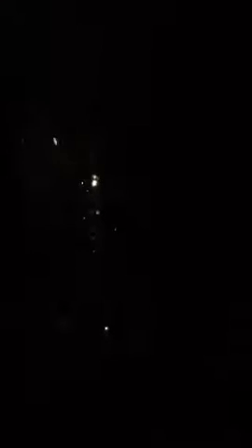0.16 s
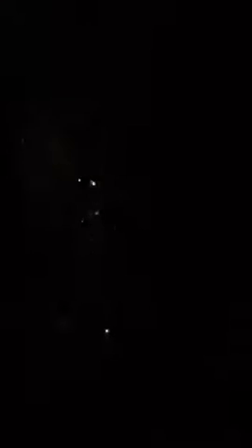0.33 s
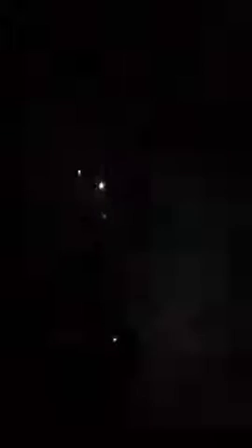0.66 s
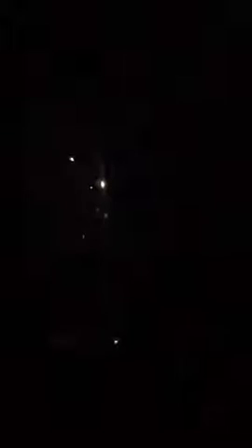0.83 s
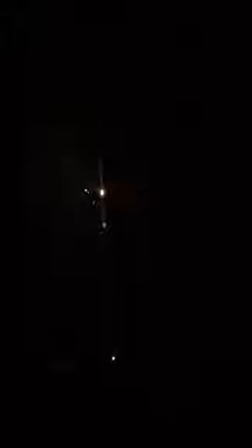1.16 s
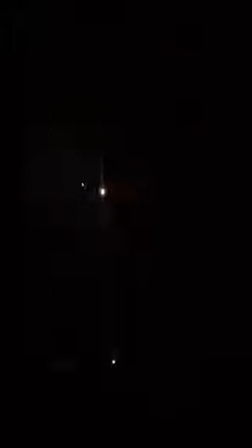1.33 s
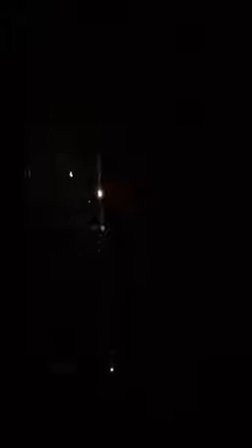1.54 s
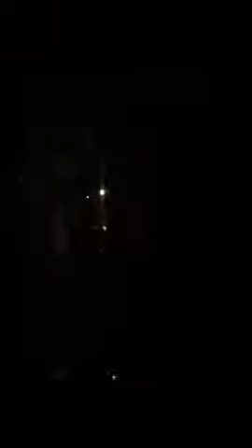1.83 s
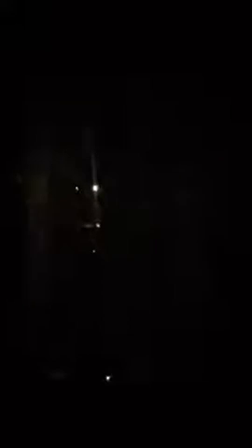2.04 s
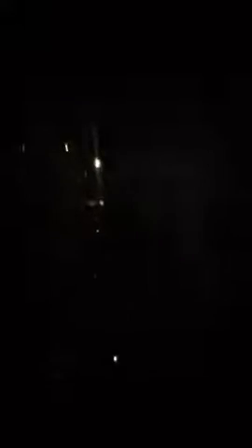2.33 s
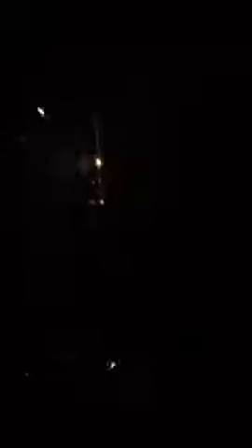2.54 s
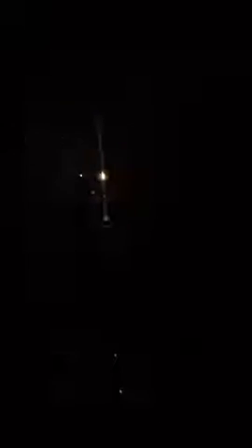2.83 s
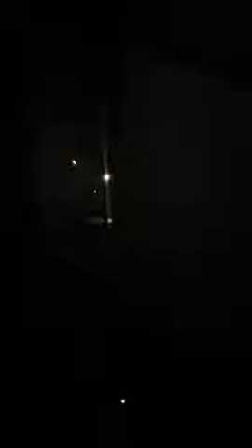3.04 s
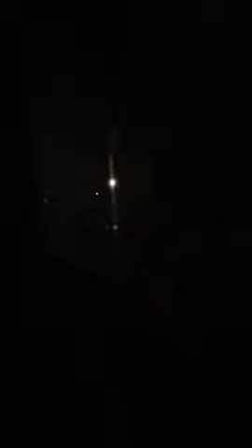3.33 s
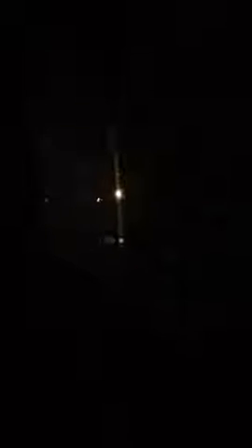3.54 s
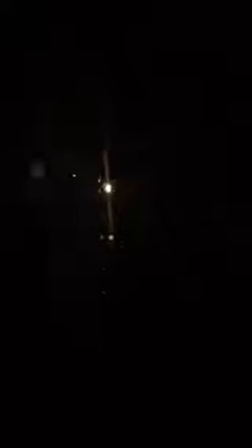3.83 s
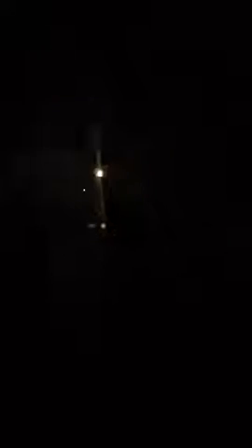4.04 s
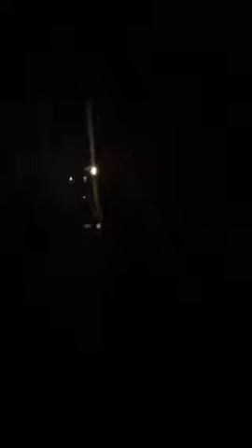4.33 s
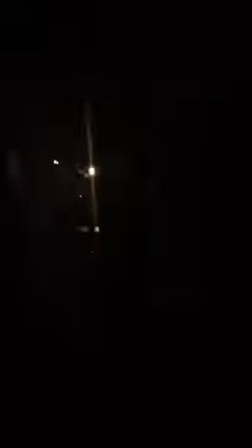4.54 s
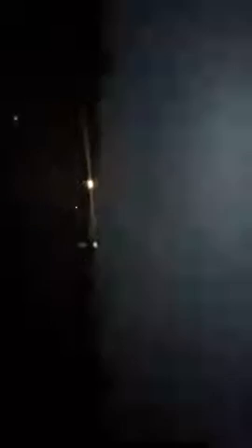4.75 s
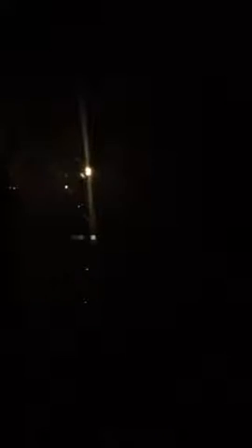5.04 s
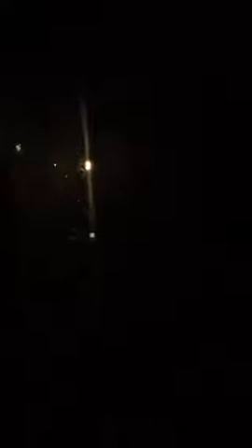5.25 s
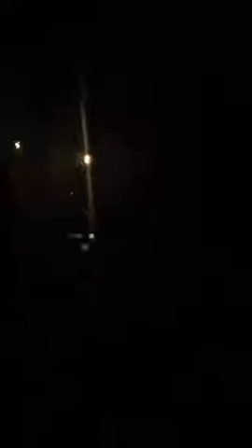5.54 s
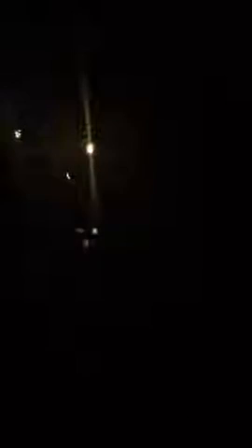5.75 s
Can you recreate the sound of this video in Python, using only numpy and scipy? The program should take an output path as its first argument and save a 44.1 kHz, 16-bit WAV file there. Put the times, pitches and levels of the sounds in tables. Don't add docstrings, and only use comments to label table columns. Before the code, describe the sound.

Heavy rain roars steadily on a car roof while a deep, lurching road and wind rumble swells underneath and drops tick on the windscreen.

```python
import sys
import numpy as np
from scipy import signal
from scipy.fft import rfft, irfft, next_fast_len
from scipy.io import wavfile
from scipy.ndimage import uniform_filter1d

SR = 44100
rng = np.random.default_rng(int(sys.argv[2]) if len(sys.argv) > 2 else 0)


def to_linear_factor(level_db):
    exponent = np.asarray(level_db, float) / 20
    return 10 ** exponent


def output_pcm(signal):
    pcm = np.clip(np.atleast_2d(signal).T, -1, 1) * 32767
    wavfile.write(sys.argv[1], SR, np.round(pcm).astype(np.int16))


N = 259749


def rms_one(x):
    return x / np.sqrt(np.mean(x ** 2) + 1e-20)


def drift(rate_hz):
    r = np.exp(-80 * np.pi * rate_hz / SR)
    chance = rng.standard_normal(N // 40 + 2002)
    slow = signal.lfilter([1], [1, -2 * r, r * r], chance)[2000:]
    return np.interp(np.arange(N) / 40, np.arange(len(slow)), rms_one(slow))


def colour(x, spectrum):
    size = next_fast_len(N)
    hz = np.maximum(np.arange(size // 2 + 1) * SR / size, 1)
    point_hz, point_db = np.array(spectrum, float).T
    gain_db = np.interp(np.log(hz), np.log(point_hz), point_db, left=-90, right=-90)
    return rms_one(irfft(rfft(x, size) * to_linear_factor(gain_db), size)[:N])


def resonate(x, modes):
    out = 0
    for k, (hz, width_hz, gain_db) in enumerate(modes):
        r = np.exp(-np.pi * width_hz / SR)
        b = [(1 - r * r) / 2, 0, (r * r - 1) / 2]
        a = [1, -2 * r * np.cos(2 * np.pi * hz / SR), r * r]
        out = out + (-1) ** k * to_linear_factor(gain_db) * signal.lfilter(b, a, x + 1e-18)
    return out


def swells(s, heights, half_s):
    t = np.arange(0, N + 40, 40) / SR
    bells = np.exp(-((t[:, None] - s) / half_s) ** 2) @ heights
    return np.interp(np.arange(N) / SR, t, bells)


def shaken_level(rest_db, swell_power):
    return 10 * np.log10(to_linear_factor(2 * rest_db) + swell_power)


def body_mode(spectrum, level_db, span_s, firmness):
    x = colour(rng.standard_normal(N), spectrum)
    width = int(span_s * SR)
    chance_power = uniform_filter1d(uniform_filter1d(x ** 2, width), width) + 0.04
    return to_linear_factor(level_db) * rms_one(x / chance_power ** (firmness / 2))


def rumble():
    # frequency in Hz, density in dB per Hz
    throb_spectrum = [(15, -35.5), (25, -8), (32, -10), (43, 3), (55, 2.5), (66, -2.5), (80, -32)]
    boom_spectrum = [(50, -32.5), (62, -9), (72, -3.5), (92, 0), (110, -4.5), (122, -8.5), (145, -39)]
    drone_spectrum = [(95, -41), (112, -1), (135, -1.5), (160, -3.5), (190, -5.5), (215, -13.5), (260, -21),
                      (340, -33.5)]
    # time in seconds, peak in dB
    buffets = [(.138, -33), (.741, -40), (.957, -29.5), (1.249, -37), (1.524, -30), (1.669, -29),
               (1.85, -31), (2.041, -32), (2.156, -28), (2.4, -29), (2.5, -31), (2.62, -32), (3.05, -30),
               (3.365, -27.5), (3.735, -34), (3.959, -33), (4.086, -28), (4.288, -27), (4.51, -28),
               (5.1, -27.5), (5.379, -32), (5.531, -29.5), (5.698, -30), (5.828, -26)]
    # time in seconds, peak in dB, sharpness from 0 to 1
    bumps = [(.036, -25, 0.087), (.238, -26.5, 1), (.39, -23.5, .1), (.59, -29, 0.41), (.81, -21.5, 0.015),
             (1.005, -28, 0.019), (1.191, -23, 0.11), (1.331, -30, 0.0067), (1.438, -29, .9),
             (1.64, -21.5, .6), (2.135, -26.5, .4), (2.33, -23, 0.33), (2.472, -21.5, 0.031),
             (2.884, -27, 0.53), (3.12, -24.5, 0.51), (3.202, -25, 0.68), (3.492, -27, 0.02),
             (3.574, -27, 1), (3.673, -25, 0.42), (3.755, -24, 0.83), (3.9, -20.5, .1),
             (4.218, -24.5, 0.025), (4.31, -28, 0.28), (4.453, -23, 0.8), (4.57, -25, 0.026),
             (4.775, -25.5, 0.91), (4.882, -28, 1), (5.13, -26, 0), (5.299, -24.5, 0.0041),
             (5.637, -27.5, 0.31)]
    # time in seconds, half length in seconds, depth in dB
    lulls = [
        (0.696, 0.052, -4.5),
        (0.891, 0.027, -10.5),
        (1.927, 0.076, -1.5),
        (2.675, 0.079, -3.5),
        (2.946, 0.018, -6),
        (3.36, 0.023, -2.5),
        (5.01, 0.023, -2),
    ]
    buffet_half_s, bump_half_s = 0.028, 0.026

    s, half_s, depth_db = np.transpose(lulls)
    lull_db = swells(s, depth_db, half_s)
    s, peak_db = np.transpose(buffets)
    throb_db = shaken_level(-36 + lull_db, swells(s, to_linear_factor(2 * peak_db), buffet_half_s))
    s, peak_db, sharp = np.transpose(bumps)
    power = to_linear_factor(2 * peak_db)
    boom_db = shaken_level(-31 + lull_db, swells(s, power * (1 - sharp), bump_half_s))
    drone_db = shaken_level(-29.5 + lull_db, swells(s, power * sharp, bump_half_s))

    throb = body_mode(throb_spectrum, throb_db, span_s=0.042, firmness=0.87)
    boom = body_mode(boom_spectrum, boom_db, span_s=0.067, firmness=0.63)
    drone = body_mode(drone_spectrum, drone_db, span_s=0.053, firmness=0.41)
    return throb + boom + drone


def downpour():
    # time in seconds, level in dB
    strength = [(0, -34.5), (.3, -34), (.65, -33.5), (1.3, -33.5), (2.0, -33.5), (2.27, -32.5),
                (2.58, -34.5), (3.0, -32.5), (3.35, -33), (3.95, -34.5), (4.2, -33.5), (4.65, -33.5),
                (5.13, -34), (5.58, -33.5), (5.89, -34)]
    s, level_db = np.transpose(strength)
    return np.interp(np.arange(N) / SR, s, level_db)


def impacts(per_s, spread_db):
    sizes = to_linear_factor(spread_db * np.minimum(rng.exponential(1, N), 4)) * rng.choice([-1, 1], N)
    return sizes * (rng.random(N) < per_s / SR)


def roof(level_db):
    # frequency in Hz, density in dB per Hz
    roof_spectrum = [(130, -35.5), (220, -0.5), (366, -2), (509, -7), (682, -10), (746, -14), (837, -12.5),
                     (1040, -14.5), (1310, -16), (1430, -16), (2400, -22.5), (2980, -24), (4600, -31.5),
                     (5980, -64.5), (10100, -120)]
    # frequency in Hz, width in Hz, gain in dB
    panels = [(1410, 70, -8), (1782, 200, -13), (680, 40, -10.5), (841, 62, -13), (374.5, 40, -8),
              (3054, 300, -24.5), (2526, 110, -25)]
    hits = rms_one(impacts(per_s=9000, spread_db=1.5)) * to_linear_factor(0.46 * drift(14))
    ringing = to_linear_factor(15) * resonate(rms_one(hits[::-1]), panels)
    return to_linear_factor(level_db) * rms_one(colour(hits, roof_spectrum) + ringing)


def cabin(hits, modes):
    t60_s, tail_db = 0.043, -17
    r = to_linear_factor(-2 * 60 / (t60_s * SR))
    delay = np.r_[np.zeros(24), 1]
    energy = signal.lfilter(delay, [1, -r], hits ** 2 + 1e-18)
    tail = to_linear_factor(tail_db) * np.sqrt(energy) * rng.standard_normal(N)
    return resonate(hits + tail, modes)


def windscreen(level_db):
    # time in seconds, peak in dB, low part in dB relative to the peak
    drops = [(0.178, -32, -1), (0.2184, -30.5, -6), (0.608, -28.5, 5), (0.8031, -32, -1), (0.843, -28, -6),
             (1.1133, -24, -11), (1.3219, -26, -20.5), (1.4335, -30, -2), (1.538, -30, -8),
             (1.5983, -27.5, -5), (1.6741, -30, 0), (2.0927, -30, -8), (2.2995, -29.5, -12),
             (2.4274, -27, -9), (2.4768, -29, -6), (2.6854, -33, -8), (2.8563, -27, -6.5), (3.331, -28, -6),
             (3.588, -28.5, -3), (4.0052, -27, -12), (4.2067, -30, -16), (4.311, -30, -13),
             (4.4205, -34, -9), (4.555, -33, -4), (4.7247, -28.5, -3), (5.1866, -33, -1), (5.506, -31, -6),
             (5.6361, -29, -6), (5.671, -38, -2.5), (5.8631, -33, -6)]
    # frequency in Hz, width in Hz, gain in dB
    glass = [(4420, 1500, -1.5), (5780, 1080, 3.5), (7080, 2100, -1.5)]
    low_glass = [(3530, 370, 0)]

    clumps = to_linear_factor(3.2 * drift(8.1))
    small = cabin(impacts(per_s=900 * clumps, spread_db=2.5), glass)
    spray = resonate(rng.standard_normal(N), glass)
    patter = to_linear_factor(level_db) * rms_one(rms_one(small) + rms_one(spray))

    s, peak_db, low_db = np.transpose(drops)
    at = (s * SR).astype(int) + 40
    tick, thud = np.zeros(N), np.zeros(N)
    tick[at] = to_linear_factor(peak_db + 11.5)
    thud[at] = to_linear_factor(peak_db + 11 + low_db)

    middling_db, middling_low_db = -37, -11
    middling = to_linear_factor(middling_db + 14.5) * impacts(per_s=9, spread_db=1)
    tick = tick + middling
    thud = thud + to_linear_factor(middling_low_db - 5.5) * middling
    return patter + cabin(tick, glass) + cabin(thud, low_glass)


def scene():
    roof_db = downpour()
    glass_db = -51.5 + 0.1 * (roof_db - roof_db.mean())
    return (rumble() + roof(roof_db) + windscreen(glass_db))[None]


def thin_out(x):
    weak_db, weak_from_hz = -6.5, 1800
    edge_hz, edge_spread_hz = 8120, 90
    lead = 1024 - 265
    hz, _, z = signal.stft(np.pad(x, (lead, 0)), SR, "cosine", 2048, 1024)
    power = uniform_filter1d(np.abs(z) ** 2, size=5, axis=0)
    usual = power.mean(axis=1, keepdims=True)
    weak = (power < to_linear_factor(2 * weak_db) * usual) & (hz[:, None] > weak_from_hz)
    weak = uniform_filter1d(weak * 1., size=5, axis=0) > 0.1
    top_hz = edge_hz + edge_spread_hz * rng.standard_normal(z.shape[1])
    kept = z * (~weak & (hz[:, None] < top_hz))
    return signal.istft(kept, SR, "cosine", 2048, 1024)[1][lead:lead + N]


def low_pass(x):
    return signal.sosfilt(signal.butter(12, 8740, fs=SR, output="sos"), x)


def record(dry):
    cut = signal.cheby2(18, 60, 8640, fs=SR, output="sos")
    running = np.pad(dry, ((0, 0), (500, 0)), "reflect")
    narrow = signal.sosfilt(cut, running)[0, 500:]
    return low_pass(thin_out(narrow)[None])


dry = scene()
out = record(dry)
output_pcm(out)
```